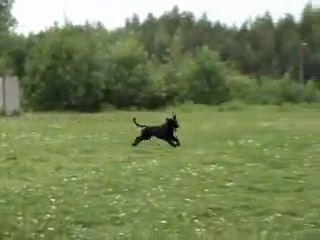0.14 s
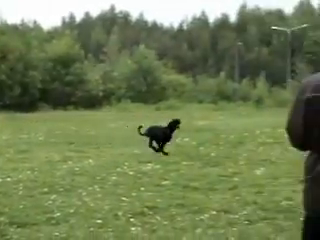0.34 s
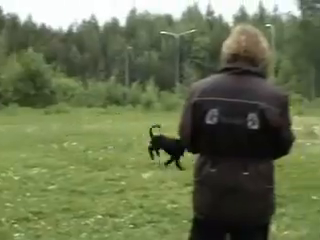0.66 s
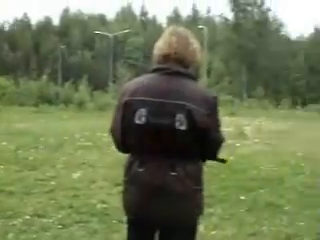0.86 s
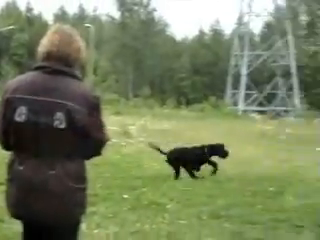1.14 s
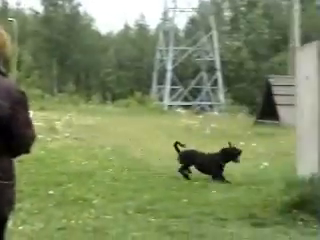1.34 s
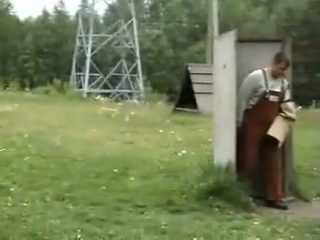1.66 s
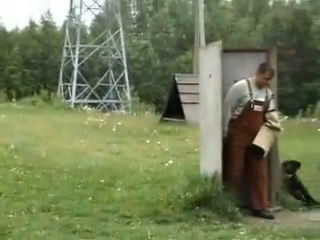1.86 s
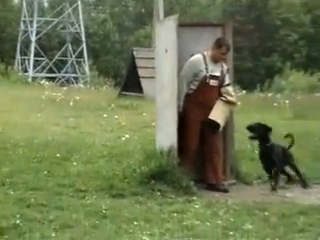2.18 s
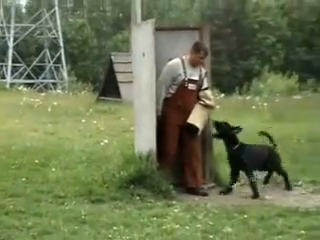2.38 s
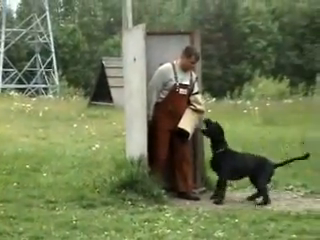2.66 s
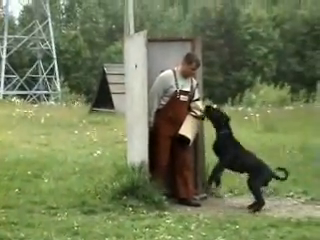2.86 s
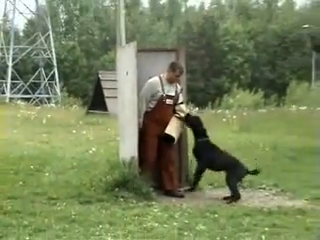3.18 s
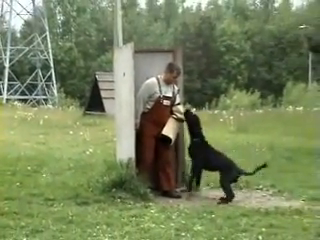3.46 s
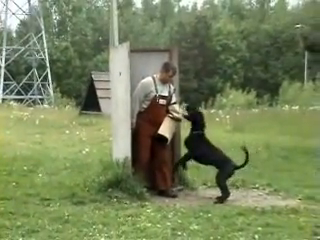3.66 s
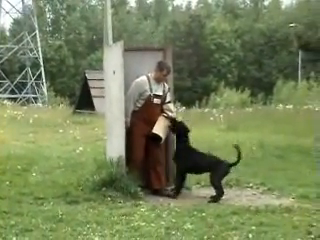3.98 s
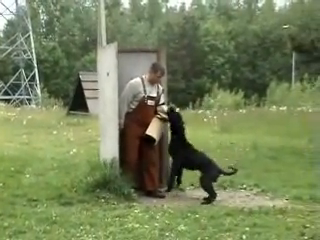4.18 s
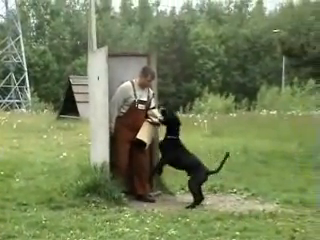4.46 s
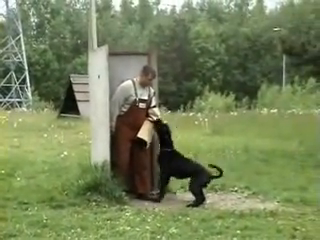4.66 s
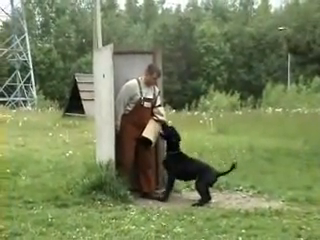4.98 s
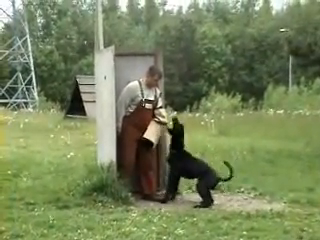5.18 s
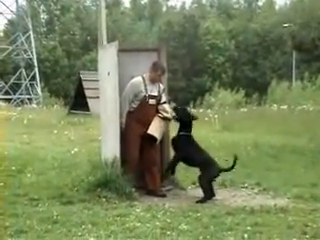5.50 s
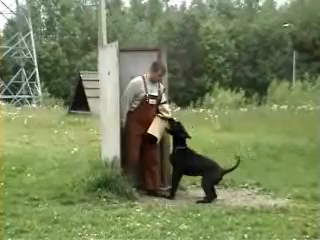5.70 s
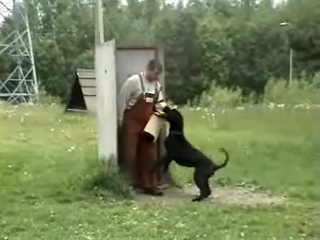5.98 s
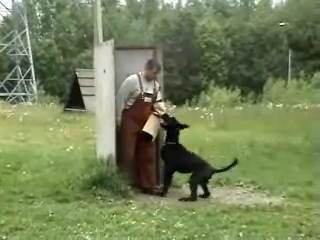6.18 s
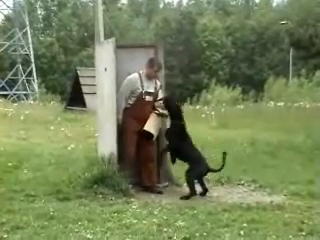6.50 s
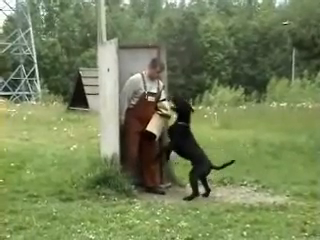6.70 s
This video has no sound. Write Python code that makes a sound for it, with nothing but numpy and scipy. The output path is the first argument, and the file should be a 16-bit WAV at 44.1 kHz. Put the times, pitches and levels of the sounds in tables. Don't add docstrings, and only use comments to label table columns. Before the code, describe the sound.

Loud, hoarse big-dog barks in an open field: a burst of four, a gap with grass rustling, then nine regular barks over distant traffic hum.

```python
import sys
import numpy as np
from scipy import signal
from scipy.fft import rfft, irfft
from scipy.io import wavfile
from scipy.ndimage import uniform_filter1d, minimum_filter1d

SR = 44100
rng = np.random.default_rng(int(sys.argv[2]) if len(sys.argv) > 2 else 0)


def to_wav(s):
    ch = np.atleast_2d(s).T
    pcm = np.round(np.clip(ch, -1, 1) * 32767)
    wavfile.write(sys.argv[1], SR, pcm.astype(np.int16))


def attenuation_scalar(level_db):
    decades = np.asarray(level_db, float) / 20
    return 10 ** decades


N = 301644


def bark(rows, snap, rough, spread):
    # (centre [Hz], width [Hz], level [dB])
    nose = [(3370, 1300, 0.5), (4184, 1000, 2.5), (4774, 850, 2), (5396, 1370, -1), (6430, 2000, -14)]
    s, effort_db, chest_hz, chest_db, mouth_hz, muzzle_hz, muzzle_db, breath_db = np.transpose(rows)
    t = np.arange(s[0], s[-1], 1 / SR)
    effort_db, chest_db, muzzle_hz, muzzle_db, breath_db = (
        np.interp(t, s, c) for c in (effort_db, chest_db, muzzle_hz, muzzle_db, breath_db))
    chest_hz, mouth_hz = stepped(t, s, chest_hz), stepped(t, s, mouth_hz)
    effort_db += 6.5 * np.tanh((t - snap) / 0.0027) * np.exp(-abs(t - snap) / 0.01)
    noises = rng.standard_normal((4 + len(nose), SR // 3))[:, :len(t)]
    wobble, unevenness, hiss, air_hiss, *drifts = noises

    pitch_wobble = 1 + 0.05 * evened(uniform_filter1d(wobble, size=120))
    turns = np.cumsum(chest_hz * pitch_wobble) / SR
    folds = sum(np.cos(2 * np.pi * k * turns) for k in range(1, 8))
    folds *= 1 + 0.49 * np.cos(np.pi * turns)
    folds *= 1 + 0.77 * evened(uniform_filter1d(unevenness, size=250))
    puffs = (0.12 + np.exp(-(turns % 1) / 0.31)) * hiss
    drive = (1 - rough) * evened(folds) + rough * 5.85 * evened(puffs)

    chest = resonate(drive + 0.25 * evened(folds), chest_hz, 160)
    ribs = resonate(drive, 380 + 0 * t, 220) + 0.11 * resonate(drive, 210 + 0 * t, 72)
    cheeks = resonate(drive, 1750 + 0 * t, 570)
    mouth = resonate(resonate(drive, mouth_hz, 220), mouth_hz, 890)
    throat_hz = np.interp(t, [snap, s[-1]], [1560, 1250])
    throat = resonate(drive, throat_hz, 400)
    mouth += spread * (1.31 * resonate(drive, 950 + 0 * t, 617) - 0.79 * throat)
    muzzle = resonate(drive, muzzle_hz, 170) + 0.38 * resonate(drive, 2150 + 0 * t, 850)

    air = air_hiss * (0.4 + np.exp(-(turns % 1) / 0.4))
    breath = 0
    for drift, (hz, width, db) in zip(drifts, nose):
        flutter = evened(uniform_filter1d(uniform_filter1d(drift, size=700), size=700))
        breath = breath + attenuation_scalar(db + 3.5 * flutter) * resonate(air, hz + 0 * t, width)

    mouth_share = np.sqrt(np.clip(1 - attenuation_scalar(2 * chest_db) - attenuation_scalar(2 * muzzle_db), 0.03, 1))
    voice = attenuation_scalar(chest_db) * steady(chest, size=900) - mouth_share * steady(mouth, size=900)
    voice += attenuation_scalar(muzzle_db) * steady(muzzle, size=900)
    voice -= attenuation_scalar(-15.5) * steady(ribs, size=900) + attenuation_scalar(-23.5) * steady(cheeks, size=900)
    voice = signal.sosfilt(signal.butter(6, 2650, fs=SR, output="sos"), voice)
    voice = steady(voice, size=500) + attenuation_scalar(breath_db) * steady(breath, size=1500)
    return s[0], attenuation_scalar(effort_db) * voice * signal.windows.tukey(len(t), 0.08)


def gesture(snap, effort, closing, chest, shares, jaw, muzzle):
    breath_lag_db = [-3, -2, 2.5, 0.5, -1.5, -0.5, -1.5]
    murmur, murmur_db, top_db, hold, sag_db = effort
    drop, lull_db, wait, pulse_db, fade = closing
    rise = 0.01
    steps = [0, murmur + rise, hold / 2 - rise, hold / 2, drop, wait, fade]
    s = snap - murmur + np.cumsum(np.abs(steps))
    high, middle, fallen, low, swell_db = chest
    effort_db = np.array([murmur_db, top_db, top_db + sag_db / 2 + swell_db, top_db + sag_db,
                          lull_db, pulse_db, pulse_db - 22])
    lull_hz = fallen + 0.8 * (low - fallen)
    chest_hz = [high, high, middle, fallen, lull_hz, low, low * 0.88]
    *blast_db, deep_db, breath_db = shares
    chest_db = [-3, *blast_db, deep_db, deep_db, 4.5]
    mouth_hz = [jaw[0], *jaw[:3], *jaw[2:], jaw[3]]
    ring, shut, snap_db, mid_db, shut_db = muzzle
    muzzle_hz = [ring] * 3 + [(ring + shut) / 2] + [shut] * 3
    muzzle_db = [-7, snap_db, mid_db, mid_db, shut_db - 10, shut_db, shut_db - 10]
    breath_db = breath_db + 0.43 * (top_db - effort_db) + breath_lag_db
    return np.transpose([s, effort_db, chest_hz, chest_db, mouth_hz, muzzle_hz, muzzle_db, breath_db])


def stepped(t, s, values):
    place = np.interp(t, s, np.arange(len(s)))
    cross = np.clip((place % 1 - 0.5) * 2.3 + 0.5, 0, 1)
    return np.interp(np.floor(place) + cross, np.arange(len(s)), values)


def resonate(x, hz, width):
    turn = np.exp(2j * np.pi * np.cumsum(hz) / SR)
    r = np.exp(-np.pi * width / SR)
    return 2 * (turn * signal.lfilter([(1 - r) ** 2], [1, -2 * r, r * r], x / turn)).real


def steady(x, size):
    return x / np.sqrt(abs(uniform_filter1d(x ** 2, size)) + 1e-9)


def evened(x):
    return x / np.sqrt(np.mean(x ** 2) + 1e-20)


def read(points, hz):
    f, value = np.transpose(points)
    return np.interp(np.log(hz + 1), np.log(f + 1), value)


def colour(x, points):
    gain = attenuation_scalar(read(points, np.fft.rfftfreq(x.shape[-1], 1 / SR)))
    return irfft(rfft(x) * gain, x.shape[-1])


def field(x):
    # (frequency [Hz], time to fall by 60 dB [s])
    echo_time = [(300, 0.72), (1000, 0.53), (2500, 0.55), (7000, 0.36)]
    taps = np.zeros((2, SR // 2))
    at = np.arange(400, SR // 2 - 20, 20) + rng.integers(0, 20, (2, (SR // 2 - 401) // 20))
    np.put_along_axis(taps, at, rng.choice([-1., 1.], at.shape), 1)
    hz, t, z = signal.stft(taps, SR, nperseg=256)
    fading = attenuation_scalar(-60 * t / read(echo_time, hz)[:, None])
    tail = signal.istft(z * fading, SR, nperseg=256)[1]
    return signal.fftconvolve(x[None], tail / np.linalg.norm(tail[0]), axes=1)[:, :N]


def grass():
    unevenness_db = 1.2 * evened(uniform_filter1d(rng.standard_normal(N), size=300))
    grains = rng.standard_normal(N) * attenuation_scalar(unevenness_db)
    grains = evened(colour(grains, [(800, -16), (2200, 15.5), (4000, 2.5), (7800, -1)]))
    return grains * attenuation_scalar(5.0) * brushing()


def brushing():
    # (start [s], length [s], level [dB])
    brushes = [
        (0.0, 0.52, -59.5),
        (.62, 0.2, -62.5),
        (1.349, .17, -58),
        (1.617, .33, -53),
        (1.982, 0.21, -50.5),
        (2.2, .13, -48.5),
        (6.704, 0.12, -54),
    ]
    level = np.zeros(N)
    for start, length, db in brushes:
        part = level[round(start * SR):][:round(length * SR)]
        part += attenuation_scalar(db) * signal.windows.tukey(len(part), 0.61)
    return level


def road():
    # (frequency [Hz], level per Hz [dB])
    hum_colour = [(12, -50.5), (20, -38.5), (68, -1), (127, 1), (274, -4), (335, -18.5), (398, -6.5),
                  (440, -11), (499, -3.5), (624, -2.5), (781, -5.5), (1000, 0.5), (3320, -22.5),
                  (7180, -36.5), (7740, -42.5), (10100, -87), (17000, -120)]
    # (frequency [Hz], left-right likeness [0-1])
    likeness = [(60, 0.92), (130, 0.86), (300, 0.74), (660, 0.8), (1470, 0.61), (3280, 0.38), (7290, 0.7)]
    # (time [s], roar level [dB])
    traffic = [(0.0, -34), (0.34, -33.5), (0.74, -32.5), (1.5, -33), (2.02, -35.5), (3.29, -35),
               (3.5, -33.5), (5.28, -38), (5.94, -37.5), (6.1, -35), (6.31, -38), (6.84, -37)]
    frames, hz = N // 256 + 5, np.fft.rfftfreq(1024, 1 / SR)
    a, b, c, d, patches = rng.standard_normal((frames, 513, 5)).T
    patches = uniform_filter1d(uniform_filter1d(patches, size=8, axis=0), size=14, axis=1)
    patches = evened(patches)
    s, roar_db = np.transpose(traffic)
    t = np.arange(frames) * 256 / SR - 512 / SR
    low = 1 / (1 + (hz[:, None] / 300) ** 4)
    follows = low * 0.67 + 1 - low
    swell_db = follows * np.interp(t, s, roar_db - roar_db.mean())
    same = np.clip(read(likeness, hz), -1, 1)[:, None]
    left = a + 1j * b
    right = same * left + np.sqrt(1 - same ** 2) * (c + 1j * d)
    z = np.array([left, right]) * attenuation_scalar(read(hum_colour, hz)[:, None] + 1.2 * patches + swell_db)
    return attenuation_scalar(-33.5) * evened(signal.istft(z, nperseg=1024, noverlap=768)[1][:, :N])


def scene():
    # (folds snap into full voice [s], share of rough noise [0-1], spread of mouth resonance [0-1])
    voicings = [(.511, .4, .36), (.835, .35, .3), (1.17, .45, .5), (1.515, .4, .4), (2.907, .35, .28),
                (3.252, .3, .34), (3.55, .4, .45), (3.904, .35, .18), (4.3, .4, .25), (4.748, .35, .26),
                (5.333, .35, .13), (5.95, .3, .14), (6.545, .27, .11)]
    # (murmur before snap [s], murmur [dB], effort at snap [dB], hold [s], sag over hold [dB])
    efforts = [(.04, -28.5, -8, .095, -4), (.022, -28.5, -13, .07, 2.5), (.03, -27.5, -13.5, .065, 5.5),
               (.035, -34.5, -7, .065, -2.5), (.04, -31, -8, .075, 1.5), (.025, -36, -7.5, .09, -1),
               (.02, -37, -8.5, .09, 0.5), (.025, -30, -7.5, .082, -3), (.055, -35.5, -8, .078, -0.5),
               (.045, -35.5, -10, 0.049, 2), (.014, -28.5, -8, .085, 0.5), (.02, -28, -9, .07, 1),
               (.012, -24.5, -7.5, .06, -3)]
    # (drop into lull [s], lull [dB], lull to pulse [s], pulse [dB], fade [s])
    closings = [(.028, -25, 0.011, -25, 0.03), (.012, -15.5, .035, -17, 0.059),
                (.025, -19, .03, -16, 0.056), (.015, -16, .03, -19, .055), (.022, -21, .025, -12.5, .065),
                (.02, -16, .015, -15.5, .055), (0.016, -19, 0.024, -14, 0.079),
                (0.015, -19.5, .055, -17, .035), (.022, -25, 0.018, -20, .06), (.025, -19, .038, -10, .055),
                (.018, -25, 0.039, -20, 0.043), (.012, -27, .045, -17.5, .05),
                (.035, -20.5, .022, -15.5, .03)]
    # (at snap [Hz], mid-hold [Hz], end of hold [Hz], closing [Hz], mid-hold swell [dB])
    chests = [(451.7, 545, 490, 360, 1), (571, 540, 520, 390, 5.5), (538, 530, 455, 385, 1),
              (544.6, 540, 430, 340, -2), (582, 585, 570, 345, -1), (603.6, 600, 440, 325, -2),
              (612, 612, 430, 430, -0.5), (649, 630, 520, 340, 0), (605, 570, 410, 345, -4),
              (587.4, 570, 415, 340, -0.5), (606, 590, 530, 355, -2), (586, 590, 540, 385, 0.5),
              (628, 620, 600, 380, -0.5)]
    # (chest at snap [dB], chest mid-hold [dB], chest end of hold [dB],
    # chest closing [dB], breath [dB])
    voice_shares = [(-6.5, -14, -2.5, -4.5, -27), (-6.5, -2, -7, -2.5, -31), (-10, -7.5, -3, -2.5, -24),
                    (-4.5, -1, -2, -1.5, -29), (-1, -5.5, -6, -2, -32.5), (-5.5, -16.5, -6, -3.5, -30),
                    (-4, -4.5, -6.5, -1.5, -31.5), (-1.5, -7, -17, -1.5, -31),
                    (-4.5, -19, -11.5, -2.5, -31.5), (-7.5, -17.5, -13, -5.5, -28.5),
                    (-10.5, -25, -13.5, -2.5, -32.5), (-9, -18, -20, -2.5, -33.5),
                    (-8.5, -23.5, -20, -7.5, -34.5)]
    # (at snap [Hz], mid-hold [Hz], end of hold [Hz], closing [Hz])
    jaws = [(1670, 1520, 980, 950), (1532, 1340, 1120, 1080), (1577, 800, 1250, 980),
            (970, 1090, 1400, 1040), (995, 940, 800, 1250), (829, 830, 853, 830), (1110, 1020, 1060, 860),
            (960, 830, 900, 820), (1045, 900, 1050, 840), (870, 960, 1030, 803), (1050, 930, 1020, 930),
            (1050, 880, 1010, 990), (1012, 974, 1000, 933)]
    # (blast [Hz], closing [Hz], at snap [dB], mid-hold [dB], closing [dB])
    muzzles = [(2167, 1700, -3, -7.5, -2.5), (2214, 1800, -5, -12, -5), (2100, 2170, -3, -9.5, -2),
               (2087, 1800, -3.5, -10.5, -4.5), (2030, 2060, -35, -28, -13),
               (2114, 2100, -12.5, -14.5, -9.5), (2084, 1500, -19, -19, -9.5), (2030, 2004, -21, -18, -8),
               (2090, 2500, -25, -13.5, -10.5), (2157, 2080, -21.5, -12, -14),
               (2120, 2020, -24, -21, -13.5), (2176, 2090, -25.5, -23.5, -13),
               (2160, 2290, -19.5, -16.5, -13.5)]
    dog = np.zeros(N)
    for voicing, *parts in zip(voicings, efforts, closings, chests, voice_shares, jaws, muzzles):
        start, sound = bark(gesture(voicing[0], *parts), *voicing)
        dog[round(start * SR):][:len(sound)] += sound
    dog = colour(dog, [(110, -26.5), (190, -2.0), (8000, -1.5)])
    return dog + attenuation_scalar(-19) * field(dog) + grass() + road()


def roll_off(x):
    return signal.sosfilt(signal.butter(12, 7890, fs=SR, output="sos"), x)


def record(dry):
    # (frequency [Hz], left over right [dB])
    port_balance = [(60, 1), (130, -3), (300, 3.5), (660, 3), (1470, 4.5), (3280, 2.0), (7290, -7)]
    left = colour(dry[0], [(f, d / 2) for f, d in port_balance])
    right = colour(dry[1], [(f, -d / 2) for f, d in port_balance])
    ports = np.array([left, right])
    peak_power = -minimum_filter1d(-(ports ** 2).max(0), size=90)
    over_db = np.maximum(10 * np.log10(peak_power + 1e-12) + 3.0, 0)
    ports = ports / attenuation_scalar(0.4 * uniform_filter1d(over_db, size=90))
    lowpass = signal.firwin(511, 7860, window=("kaiser", 9), fs=SR)
    narrow = signal.oaconvolve(ports, lowpass[None], "same")
    mid = narrow.mean(0)
    side = colour((narrow[0] - narrow[1]) / 2, [(3600, -1), (4400, -15.0), (8000, -22.0)])
    return roll_off(np.clip([mid + side, mid - side], -1, 1))


dry = scene()
out = record(dry)
to_wav(out)
```